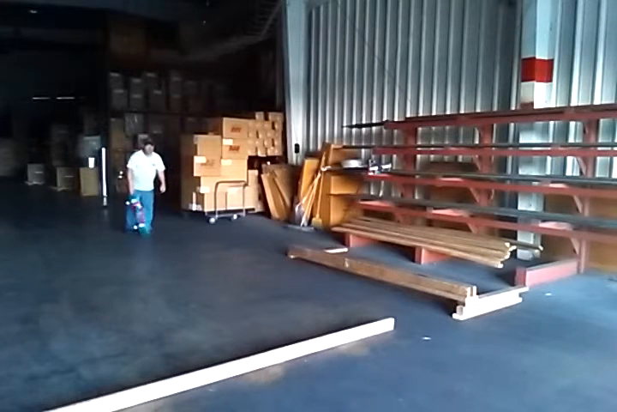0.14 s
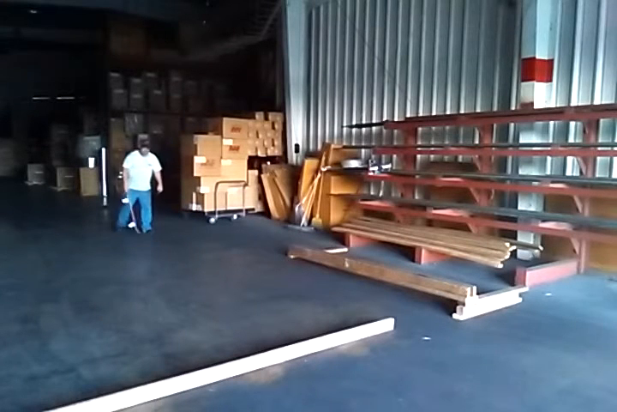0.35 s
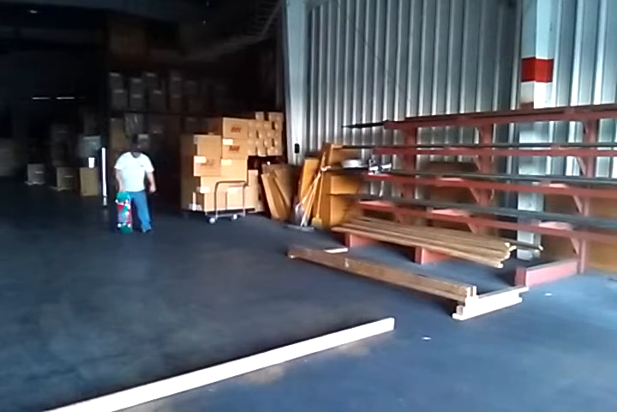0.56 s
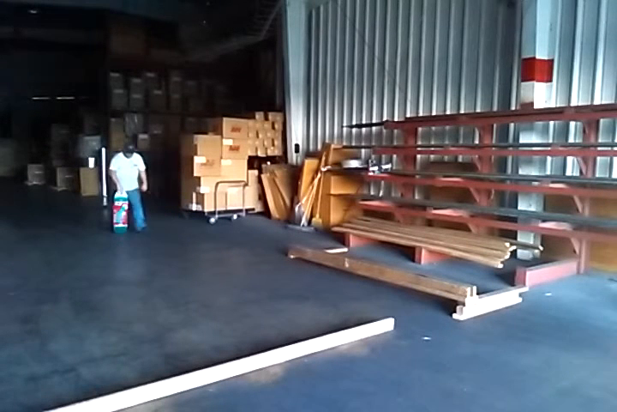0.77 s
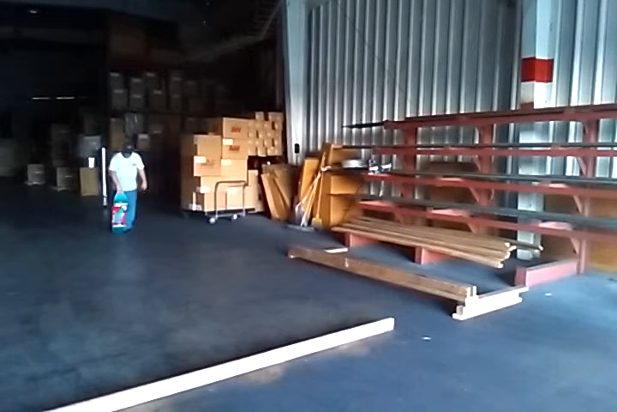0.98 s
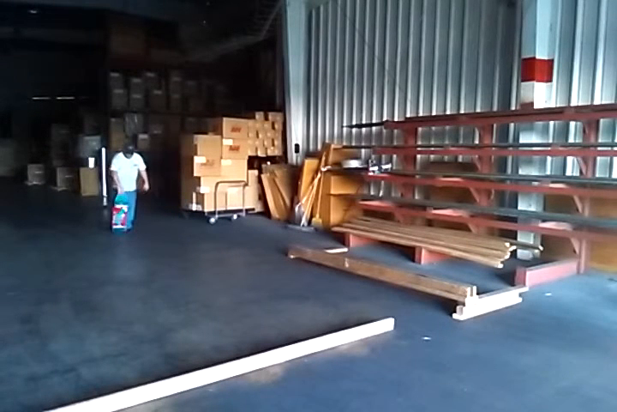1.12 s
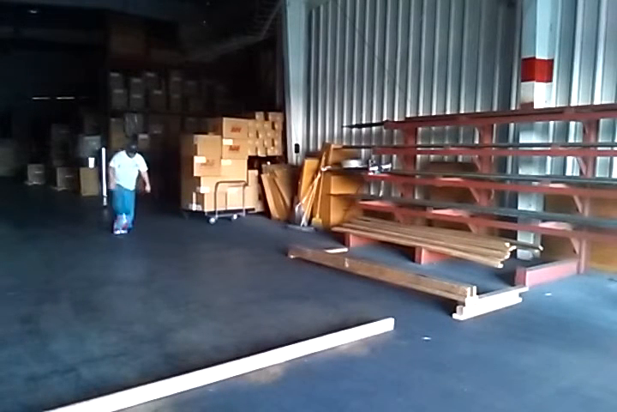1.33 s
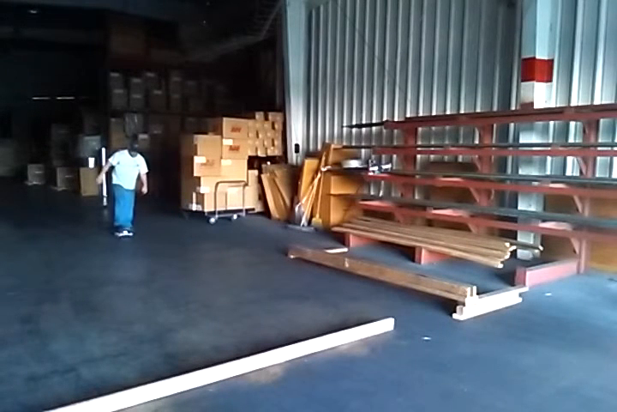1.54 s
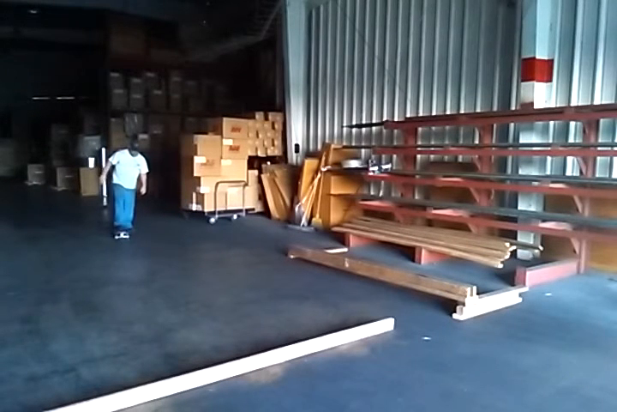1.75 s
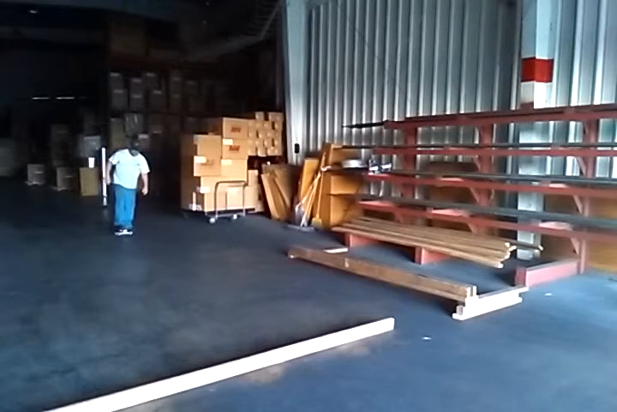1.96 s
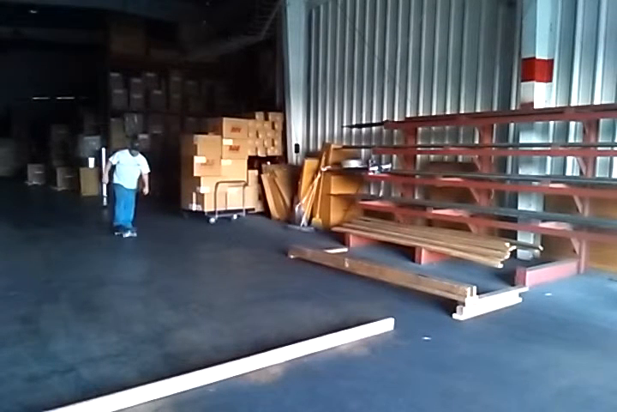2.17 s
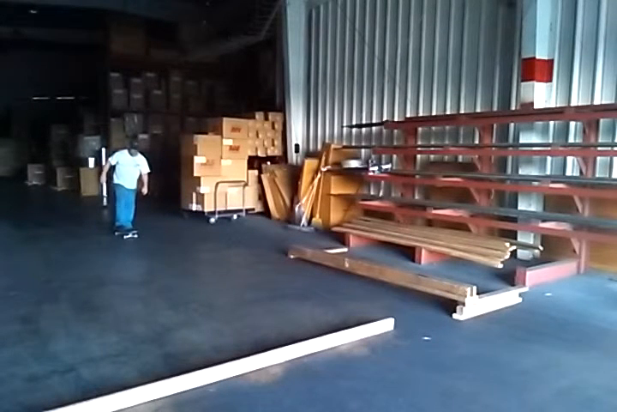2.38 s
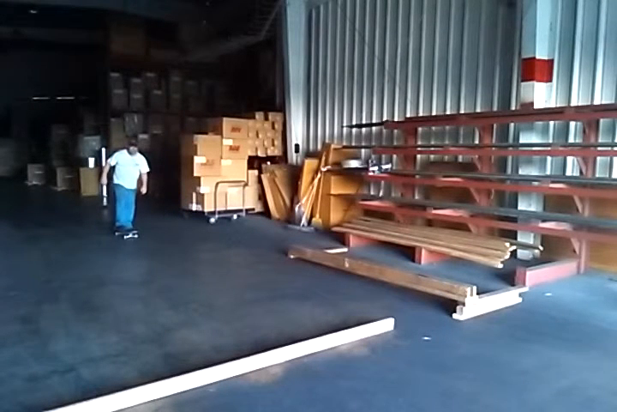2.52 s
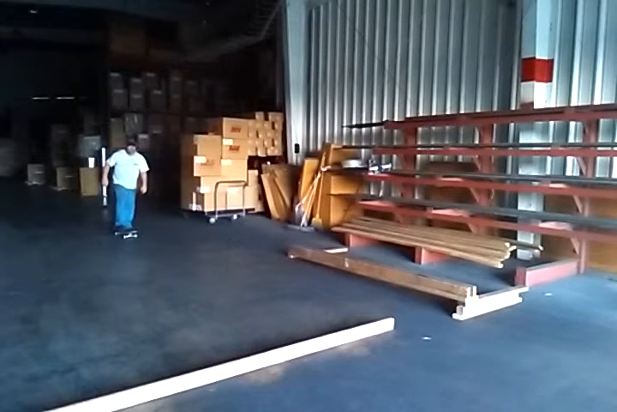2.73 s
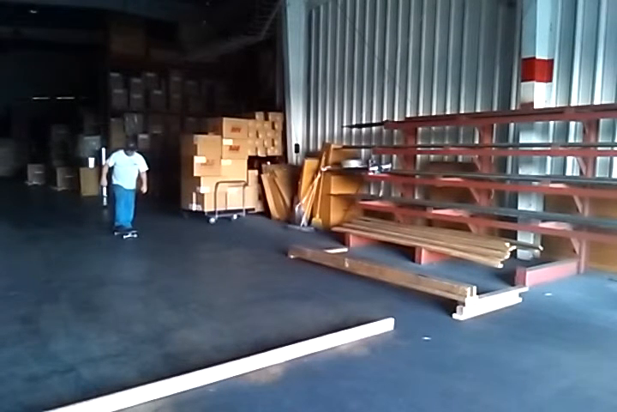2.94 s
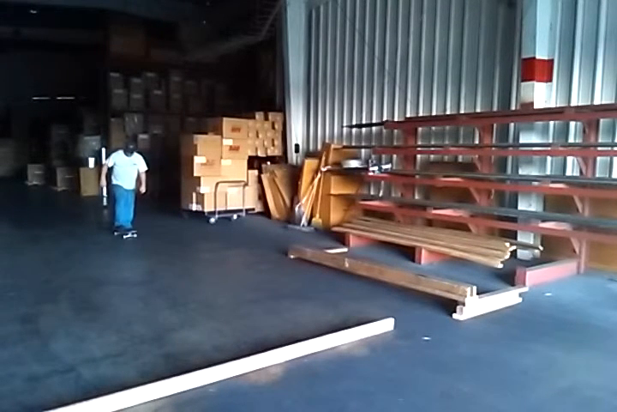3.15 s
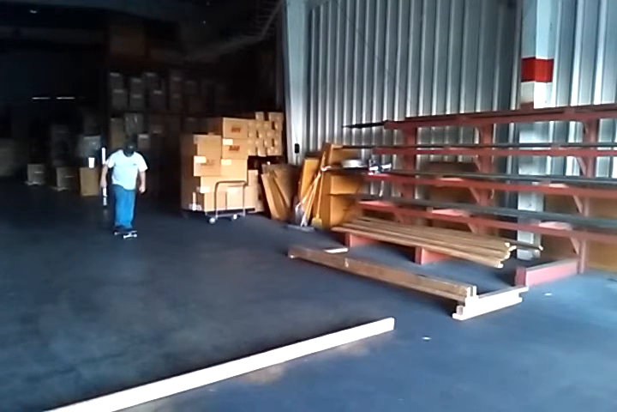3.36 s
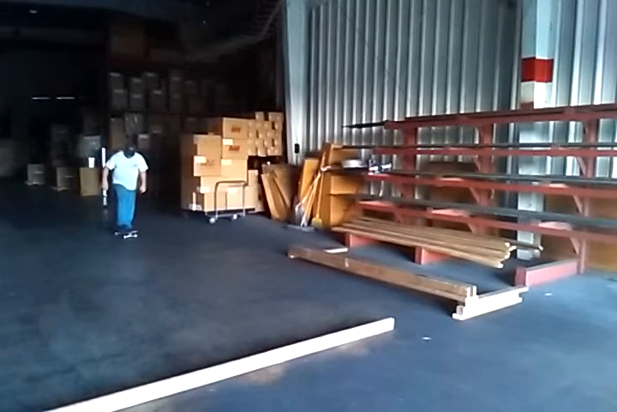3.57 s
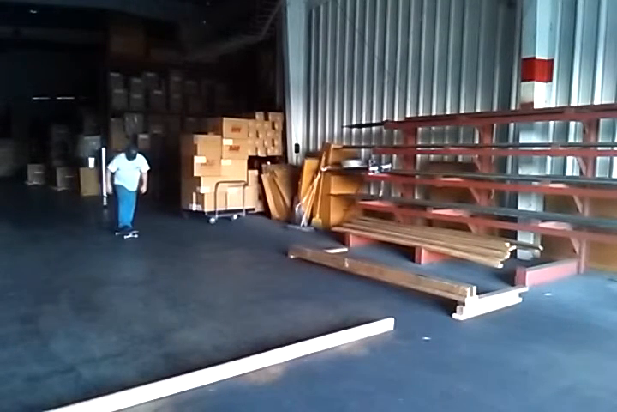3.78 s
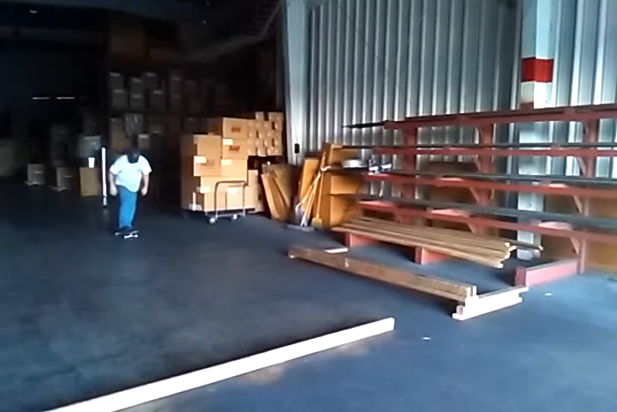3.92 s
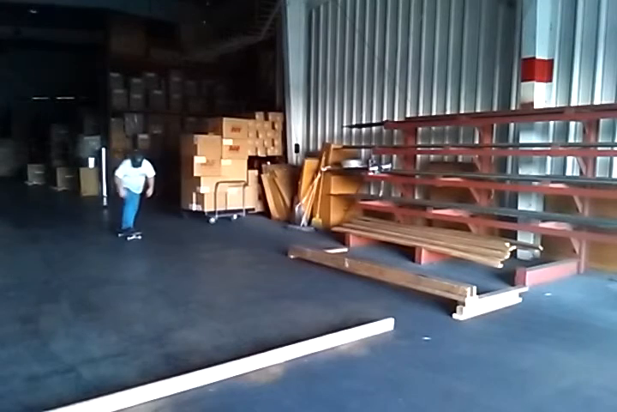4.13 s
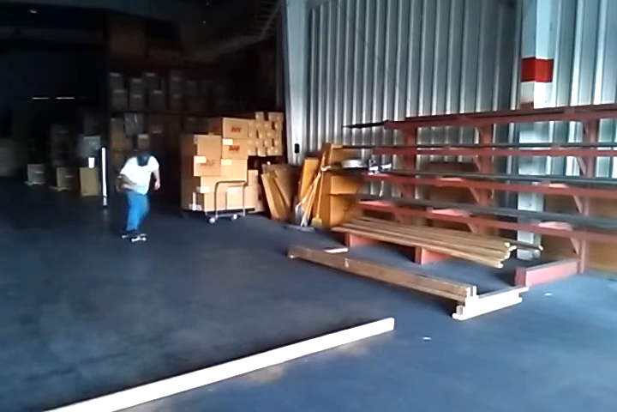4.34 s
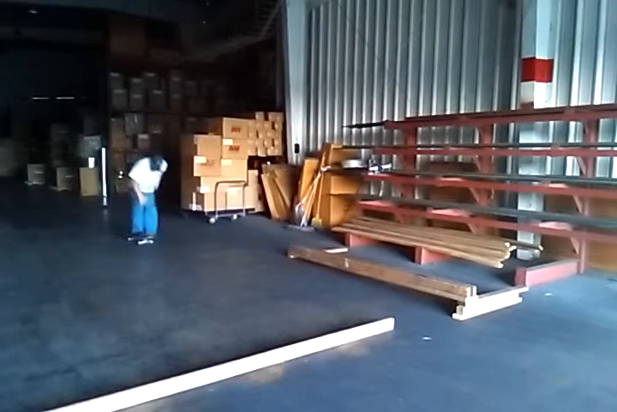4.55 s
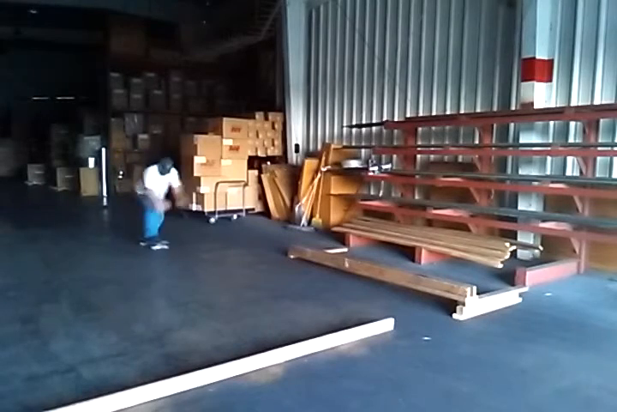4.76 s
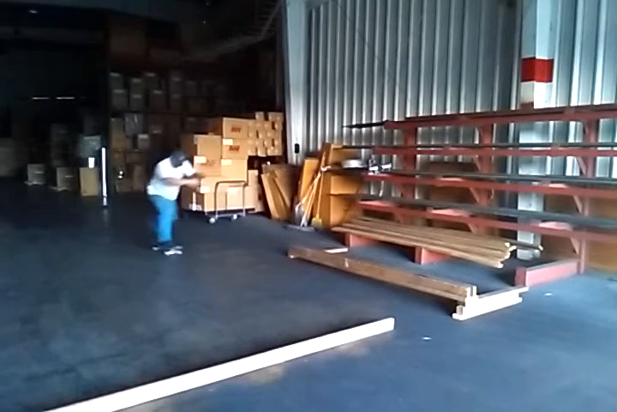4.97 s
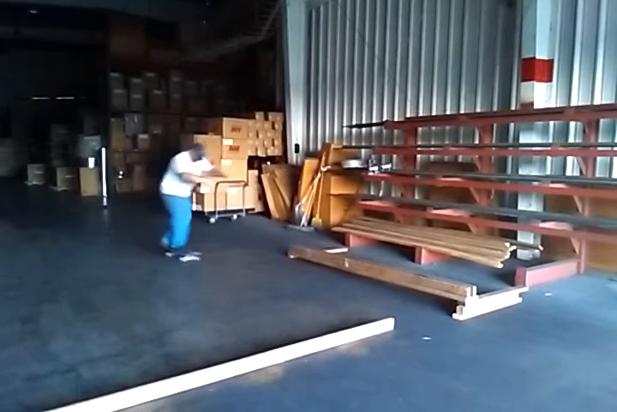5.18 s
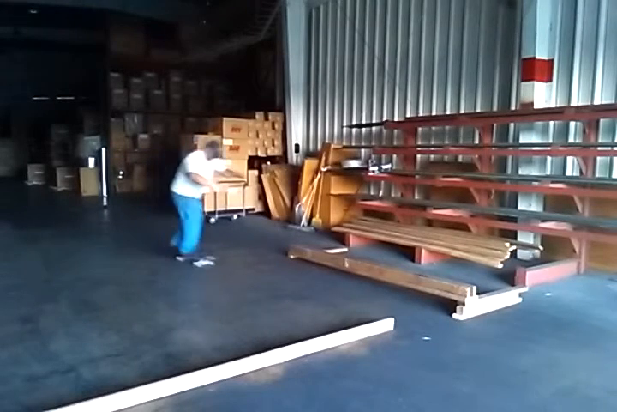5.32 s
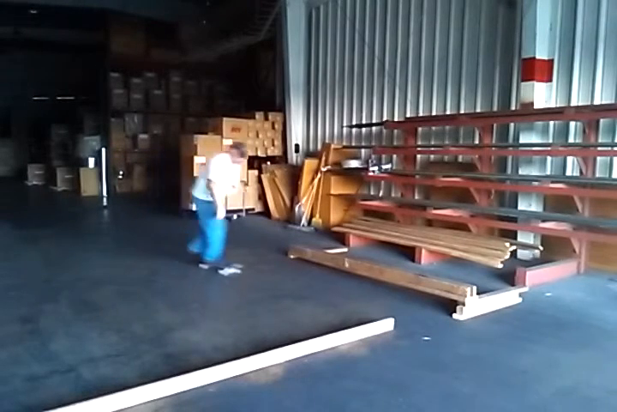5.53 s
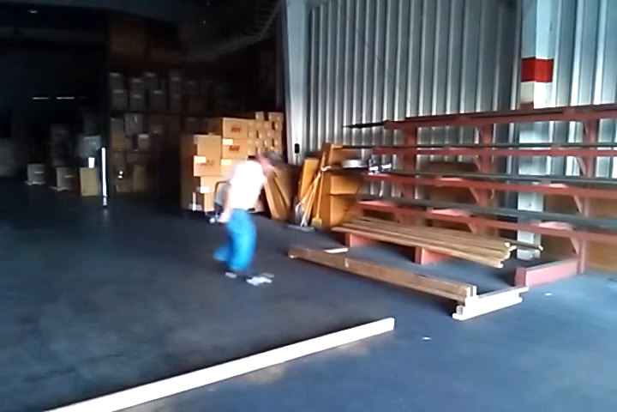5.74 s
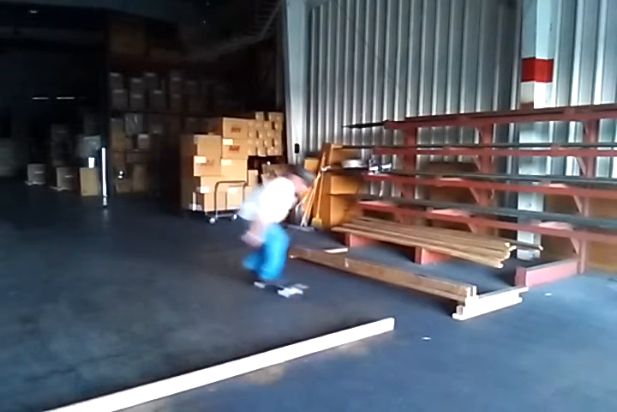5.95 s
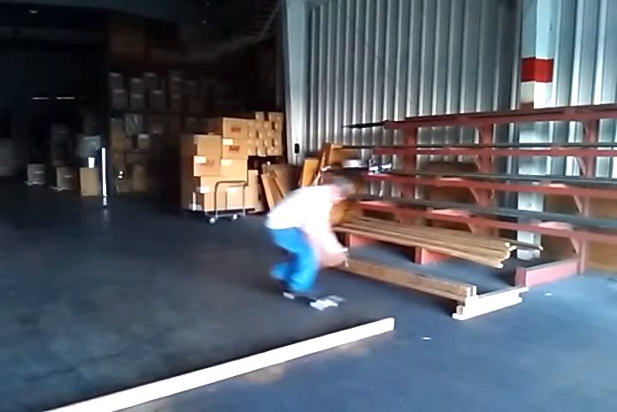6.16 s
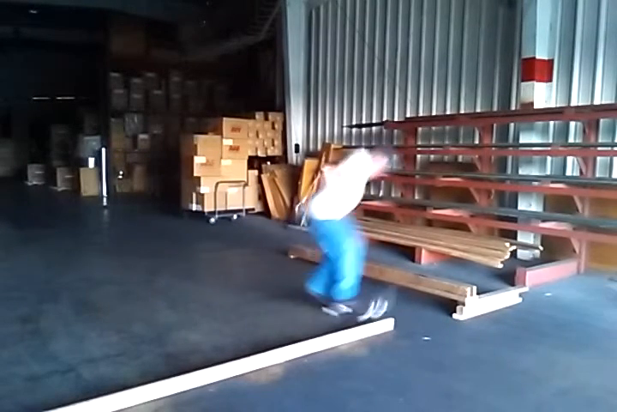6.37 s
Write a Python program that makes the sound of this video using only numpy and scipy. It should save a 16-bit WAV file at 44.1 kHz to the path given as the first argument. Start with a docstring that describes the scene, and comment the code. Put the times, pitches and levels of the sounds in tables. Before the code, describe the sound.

A skateboard is dragged briefly and falls onto a concrete floor with two sharp wooden clacks that echo around a large hall. A rattling knock follows, then a lull. The board is pushed off and rumbles closer, with a bright metal click, light thumps and shoe scrapes. Underneath are a steady hush, very faint birds and a low draught on the microphone that gradually settles.

```python
"""A skateboard in a concrete warehouse is dragged, dropped with a double clack, stepped on and pushed off.
Each blow cracks and briefly rings the maple deck, and the hall answers. Scrapes, grip tape swishes and
the approaching wheels are streams of tiny collisions with a rough surface; a truck squeaks thinly once.
The microphone takes puffs of air at the open door and one soft handling knock.
Faint birds whistle outside."""
import sys
import numpy as np
from scipy import signal
from scipy.fft import rfft, irfft
from scipy.io import wavfile

SR = 44100
rng = np.random.default_rng(int(sys.argv[2]) if len(sys.argv) > 2 else 0)


def transcribe(u):
    """Save the signal u as a 16-bit wav file named by the first command-line argument.

    u: samples, shape (n,) or (channels, n), limited to [-1, 1]; the rate is SR.
    q: integer samples, one column per channel.
    """
    v = np.clip(np.atleast_2d(u).T, -1, 1)
    q = np.round(v * 32767).astype(np.int16)
    wavfile.write(sys.argv[1], SR, q)


N = 282543
TIME = np.arange(N) / SR


def amp(db):
    """Decibels to gain."""
    return 10 ** (np.asarray(db) / 20)


def unit(x):
    """Scale to rms 1."""
    return x / np.sqrt(np.mean(x ** 2) + 1e-20)


def read(points, hz):
    """Interpolate on a log-frequency axis."""
    point_hz, value = np.transpose(points)
    return np.interp(np.log(hz + 1), np.log(point_hz + 1), value)


def add(mix, start_s, sound):
    """Mix a sound in at start_s."""
    part = mix[max(round(start_s * SR), 0):][:len(sound)]
    part += sound[:len(part)]


def colour(x, spectrum, size=8192):
    """Minimum-phase filter with the given spectrum."""
    hz = abs(np.fft.fftfreq(size, 1 / SR))
    log_gain = np.log(amp(read(spectrum, hz)))
    response = np.exp(np.conj(signal.hilbert(log_gain)))
    taps = np.fft.ifft(response).real[:size // 2]
    return signal.oaconvolve(x, taps)[:len(x)]


def wander(rate_hz):
    """Slow random drift, rms 1."""
    hz = np.fft.rfftfreq(N, 1 / SR)
    return unit(irfft(rfft(rng.standard_normal(N)) * np.exp(-(hz / rate_hz) ** 2), N))


def room_air():
    """Steady hush of the room."""
    # Each row: frequency in Hz, relative density in dB.
    spectrum = [(100, 2.5), (400, -1.5), (750, -0.5), (1400, -6), (2300, -11.5), (3100, -9.5), (4000, -15),
                (7000, -19), (12000, -21), (14000, -19)]
    return amp(-62) * unit(colour(rng.standard_normal(N), spectrum))


def draught_and_knock(gust_db=-43.5, calm_db=-52.5, settle_s=2.65, bump_half_cycles=0.5):
    """Lumpy rumble that settles, low puffs of air and one soft handling knock on the microphone."""
    # Each row: frequency in Hz, relative density in dB.
    spectrum = [(10, -2.5), (25, 3), (42, -3), (57, 5), (76, -7), (130, -4.5), (200, -18), (320, -24),
                (700, -44), (2000, -84.5)]
    # Each row: centre in seconds, peak in dB, frequency in Hz. The knock is at 0.612 s.
    bumps = [(0.07, -26, 42.3), (0.587, -31, 44.6), (.612, -28, 183), (0.708, -32, 53.3), (0.976, -33, 48),
             (1.26, -30, 69), (2.142, -33, 54.4)]
    gust = amp(calm_db + (gust_db - calm_db) * np.exp(-TIME / settle_s))
    out = gust * unit(colour(rng.standard_normal(N), spectrum) * amp(1.8 * wander(19)))
    t = np.arange(-SR // 16, SR // 16) / SR
    for centre_s, db, hz in bumps:
        envelope = amp(db) * np.exp(-(t * hz / bump_half_cycles) ** 2)
        add(out, centre_s + t[0], envelope * np.cos(2 * np.pi * hz * t))
    return out


def birds_and_squeak(warble_hz=5.8):
    """Faint bird whistles and one thin, high squeak of the truck, each blurred by three paths."""
    # Each row: start and length in seconds, first and last pitch in Hz,
    # warble depth as a share of the pitch, relative level in dB. The squeak is at 4.597 s.
    glides = [(0.014, .13, 2640, 3200, 0.0097, -68), (0.461, 0.061, 3690, 3350, 0.0056, -63),
              (0.554, .08, 3344, 2290, 0, -65), (1.321, 0.1, 2780, 3440, 0.014, -70),
              (2.793, 0.1, 2924, 3332, 0.0081, -66), (4.283, 0.29, 4500, 4240, 0, -73),
              (4.597, 0.12, 5460, 5440, 0.0056, -65), (4.78, 0.18, 4836, 4818, 0.0079, -73),
              (5.006, 0.153, 3556, 3550, 0.0036, -67), (5.571, .32, 3280, 3116, .08, -61.5),
              (6.127, .12, 3265, 3470, 0, -64)]
    out = np.zeros(N)
    waver = 0.011 * wander(130)
    for start_s, length_s, first_hz, last_hz, depth, db in glides:
        t = np.arange(int(length_s * SR)) / SR
        warble = 1 - depth * np.sin(2 * np.pi * warble_hz * t)
        glide_hz = np.linspace(first_hz, last_hz, len(t)) * warble
        for delay_s, path_db in [(0, 0.5), (0.013, -4.5), (0.035, -19)]:
            hz = glide_hz * (1 + np.roll(waver, rng.integers(N))[:len(t)])
            envelope = amp(db + path_db) * signal.windows.tukey(len(t), 0.4)
            add(out, start_s + delay_s, envelope * np.sin(2 * np.pi * np.cumsum(hz) / SR))
    return out


def stroke_pressure(strokes, attack_s, release_s):
    """Each stroke builds up, holds and lets go."""
    pressure = np.zeros(N)
    for start_s, length_s, db in strokes:
        t = TIME - start_s
        rise = np.clip(np.minimum(t, length_s) / attack_s, 0, 1)
        fall = np.exp(-np.maximum(t - length_s, 0) / release_s)
        pressure += amp(db) * rise * fall
    return pressure


def friction(spectrum, grains_per_s, spread_db, waver_db, waver_hz):
    """Tiny collisions with a rough surface under wavering pressure, rms 1."""
    sizes = amp(spread_db * np.minimum(rng.exponential(1, N), 4)) * rng.choice([-1, 1], N)
    grains = sizes * (rng.random(N) < grains_per_s / SR)
    return unit(colour(grains, spectrum) * amp(waver_db * wander(waver_hz)))


def swishes():
    """Light, bright rubs over the grip tape."""
    # Each row: start and length in seconds, relative level in dB.
    strokes = [(.08, 0.18, -49.5), (.97, 0.059, -53), (5.17, 0.089, -49), (5.55, 0.21, -66),
               (6.04, 0.059, -56), (6.3, 0.12, -58)]
    # Each row: frequency in Hz, relative density in dB.
    tape = [(1000, -10), (1900, -4), (2250, 3.5), (2800, -0.5), (4900, 6.5), (6500, 3), (7800, 0),
            (10500, 6), (13500, 3)]
    pressure = stroke_pressure(strokes, attack_s=0.1, release_s=0.083)
    return pressure * friction(tape, grains_per_s=10000, spread_db=3.5, waver_db=0.5, waver_hz=30.2)


def scrapes():
    """Tail and shoe soles scrape the concrete and make the deck sing."""
    # Each row: start and length in seconds, relative level in dB.
    strokes = [(.67, 0.12, -51.5), (.86, .17, -50.5), (5.17, 0.19, -49)]
    # Each row: frequency in Hz, relative density in dB.
    grit = [(150, -16), (350, 4.5), (550, -3.5), (1150, -3.5), (1800, -6.5), (2300, -3), (3800, -11.5),
            (6000, -14), (8000, -19), (14000, -17)]
    pressure = stroke_pressure(strokes, attack_s=0.017, release_s=0.045)
    rasp = pressure * friction(grit, grains_per_s=5000, spread_db=4, waver_db=2, waver_hz=44)
    singing = signal.oaconvolve(rasp, deck_ring(centre_hz=1100, spread_oct=1.3))[:N]
    return amp(-2) * rasp + amp(-6.5) * np.std(rasp) * unit(singing)


def deck_ring(centre_hz, spread_oct):
    """Dying modes of deck and trucks; where and how hard a blow lands favours those near one pitch."""
    # Each row: frequency in Hz, relative level in dB, T60 in seconds.
    modes = [(165, -3.5, 0.087), (228, -10, 0.069), (282, -1, 0.061), (373, -2, 0.045), (488.2, -3.5, 0.13),
             (525, -9, 0.14), (604, -1.5, 0.054), (706, -4.5, 0.032), (755, -3.5, 0.094), (894, 0.5, 0.025),
             (1074, 1, 0.033), (1086, 5, 0.02), (1290, 0.5, 0.022), (1492, -2, 0.031), (1644, -5.5, 0.049),
             (1970, 7, 0.0078), (2245, -3.5, 0.017), (3045, -1.5, 0.0084)]
    t = np.arange(SR // 4) / SR
    hz, db, t60_s = np.transpose(modes)[:, :, None]
    weight = amp(db) * np.exp(-0.5 * (np.log2(hz / centre_hz) / spread_oct) ** 2)
    detuned_hz = hz * (1 + 0.026 * rng.standard_normal(hz.shape))
    cycles = detuned_hz * t + rng.random(hz.shape)
    sound = (weight * np.exp(-np.log(1000) * t / t60_s) * np.sin(2 * np.pi * cycles)).sum(0)
    sound *= 1 - np.exp(-t / 0.00029)
    return sound / np.sqrt(np.sum(sound ** 2) / (SR // 100))  # energy of 10 ms at rms 1


def crack(spectrum, decay_s):
    """Hard contact: a burst of tiny fractures, with the energy of 3 ms at rms 1."""
    t = np.arange(SR // 4) / SR
    burst = colour(rng.choice([-1., 1.], len(t)) * np.exp(-t / decay_s), spectrum)
    return burst / np.sqrt(np.sum(burst ** 2) / (SR // 333))


def contacts(ring_db, centre_hz, crack_db, chatter_s, second_wheel_s=0.004, rebound_s=0.033):
    """One blow: the two wheels of an axle land, then any chatter dies away in even, duller rebounds."""
    # Each row: delay in seconds, ring gain, ring centre in Hz, crack gain.
    rows = [(0, amp(ring_db), centre_hz, amp(crack_db)),
            (second_wheel_s, amp(ring_db - 5), centre_hz, amp(crack_db - 10))]
    for delay_s in np.arange(rebound_s, chatter_s, rebound_s):
        fade = 1 - delay_s / chatter_s
        rows.append((delay_s, fade * amp(ring_db + 1), 0.93 * centre_hz, fade * amp(crack_db - 9.5)))
    return rows


def board_blows(paths=4):
    """Each contact rings the deck and cracks; successive ones reach the hall along different paths."""
    # Each row: start in seconds, ring level in dB, ring centre in Hz, ring spread in octaves,
    # relative crack level in dB, hall send in dB, chatter length in seconds.
    blows = [(0.68, -48, 1380, 0.79, -49, -1, .06), (.867, -57, 1800, 1.1, -52, 1, 0),
             (1.4096, -21, 1100, 1.7, -22.5, 1, 0), (1.518, -18.5, 1110, 1.49, -16.5, 2.5, .095),
             (1.732, -33, 1410, 1, -25.5, 3, 0), (1.765, -30.5, 518, 0.36, -58, 1.5, 0),
             (2.2612, -31, 735, 1.8, -25, 4, 0.23), (2.69, -55.5, 1240, 1, -51, 7.5, .07),
             (3.454, -51, 1850, 0.58, -49.5, 3, 0.046), (4.592, -63.5, 910, 1.4, -54.5, 12, 0),
             (4.783, -46.5, 850, 0.66, -71, 7, .1), (4.951, -42.5, 250, 1.8, -47, 2.5, 0),
             (5.176, -45, 1602, 1.2, -45.5, 5, 0), (5.319, -31.5, 544, 0.67, -47, 4.5, 0.054),
             (5.44, -39, 340, 0.78, -55, 6, 0), (5.99, -40.5, 500, 0.28, -66, 8, 0),
             (6.091, -70, 702, 1.3, -47, 6.5, 0), (6.304, -47.5, 1770, 0.48, -51, 0.5, 0),
             (6.306, -36, 190, 0.87, -75, -11, 0)]
    # Each row: frequency in Hz, relative density of the crack in dB.
    spectrum = [(300, -15.5), (1500, -1), (2500, -1), (3100, 0.5), (4000, -4), (5400, -1.5), (6400, -1.5),
                (7600, 1), (9000, -0.5), (14000, -2.5)]
    direct, sends = np.zeros(N), np.zeros((paths, N))
    for k, (start_s, ring_db, centre_hz, spread_oct, crack_db, hall_db, chatter_s) in enumerate(blows):
        hits = contacts(ring_db, centre_hz, crack_db, chatter_s)
        for path, (delay_s, ring_gain, hz, crack_gain) in enumerate(hits, k):
            deck = ring_gain * deck_ring(hz, spread_oct)
            direct_crack = crack_gain * amp(-1) * crack(spectrum, decay_s=0.0014)
            # Summed over all directions, the crack reaches the hall with a smooth spectrum.
            hall_crack = crack_gain * amp(-1.43) * crack(spectrum, decay_s=1 / SR)
            add(direct, start_s + delay_s, deck + direct_crack)
            add(sends[path % paths], start_s + delay_s, amp(hall_db) * (deck + hall_crack))
    return direct, sends


def wheels():
    """Wheels roar on concrete, louder as the board gathers speed and comes closer."""
    # Each row: time in seconds, relative level in dB.
    levels = [(2.3, -69), (3.3, -80), (3.75, -66), (4.4, -65), (4.8, -49), (5.1, -51.5), (5.3, -46),
              (5.9, -46.5), (6.41, -42.5)]
    # Each row: frequency in Hz, relative density in dB.
    roar = [(60, -20), (160, -7), (290, -5), (380, -6), (520, 0.5), (630, -6.5), (770, -4), (1050, -12),
            (1500, -14.5), (2400, -26), (4200, -40), (8000, -35.5), (14000, -30.5)]
    gain = amp(np.interp(TIME, *np.transpose(levels)))
    return gain * friction(roar, grains_per_s=7000, spread_db=2, waver_db=0.8, waver_hz=40)


def add_truck_snap(direct, send):
    """The steel truck snaps over with a bright click."""
    # Each row: start in seconds, level in dB.
    snaps = [(4.948, -34)]
    # Each row: frequency in Hz, relative density in dB.
    steel = [(2000, -4), (4000, -31), (6500, -12), (7400, 0), (8500, -1), (10300, 4), (11400, -7),
             (12500, 3), (14000, -6)]
    for start_s, db in snaps:
        add(direct, start_s, amp(db) * crack(steel, decay_s=0.0027))
        add(send, start_s, amp(db - 3) * crack(steel, decay_s=1 / SR))


def hall(x, build_up_s=0.0027):
    """Dull echoes off stacked boxes and the door, and a dense tail that swells and dies band by band."""
    # Each row: frequency in Hz, T60 in seconds.
    decay_times = [(100, 0.97), (300, 0.59), (700, 0.53), (1400, 0.86), (2800, 1.25), (5500, 0.96),
                   (9000, 0.71), (14000, 0.54)]
    # Each row: delay in seconds, level in dB.
    echoes = [(.0042, -18), (.009, -14), (.028, -12.5), (.034, -19), (.042, -16.5), (.066, -22)]
    hz, t, bands = signal.stft(rng.standard_normal(2 * SR), SR, nperseg=256)
    decay = np.exp(-np.log(1000) * t / read(decay_times, hz)[:, None])
    swell = 1 - np.exp(-t / build_up_s)
    response = signal.istft(bands * decay * swell, SR, nperseg=256)[1]
    response *= amp(0.18) / np.linalg.norm(response)
    dull_pulse = signal.windows.hann(9)  # cardboard swallows the treble
    for delay_s, db in echoes:
        add(response, delay_s, amp(db) * dull_pulse / dull_pulse.sum())
    return signal.fftconvolve(x, response)[:N]


def scatter(x, size=64):
    """The camera body scrambles fine timing between its two microphone ports."""
    taps = rng.choice([-1., 1.], size) / np.sqrt(size)
    return signal.oaconvolve(x, taps)[:N]


def scene():
    """Board, shoes, birds and air in the hall; only the treble differs between the channels."""
    # Each row: frequency in Hz, side gain in dB.
    width = [(100, -78), (2800, -85), (4000, -56), (6000, -10.5), (9000, -4), (13000, -4.5)]
    direct, sends = board_blows()
    add_truck_snap(direct, sends[0])
    rubbing = wheels() + scrapes() + swishes()
    thin_tones = birds_and_squeak()
    direct += amp(-1) * rubbing + amp(-0.5) * thin_tones
    sends[0] += amp(-3.5) * rubbing + amp(-5) * thin_tones
    mid_air, side_air = room_air(), room_air()
    mid_hall, side_hall = [sum(hall(send) for send in sends) for _ in range(2)]
    mid = direct + mid_hall + mid_air + draught_and_knock()
    side = colour(amp(-13) * scatter(direct) + side_hall + amp(2) * side_air, width)
    return np.array([mid + side, mid - side])


def record(dry, cutoff_hz=14450):
    """Small microphone with a treble resonance, then a steep low-pass."""
    # Each row: frequency in Hz, gain in dB.
    response = [(9000, -1.5), (10200, 2.5), (11400, 4.5), (12500, 0), (14300, -6.5)]
    coloured = np.array([colour(channel, response) for channel in dry])
    lowpass = signal.firwin(511, cutoff_hz, window=("kaiser", 9), fs=SR)
    return signal.oaconvolve(coloured, lowpass[None], "same", axes=1)


dry = scene()
out = record(dry)
transcribe(out)
```